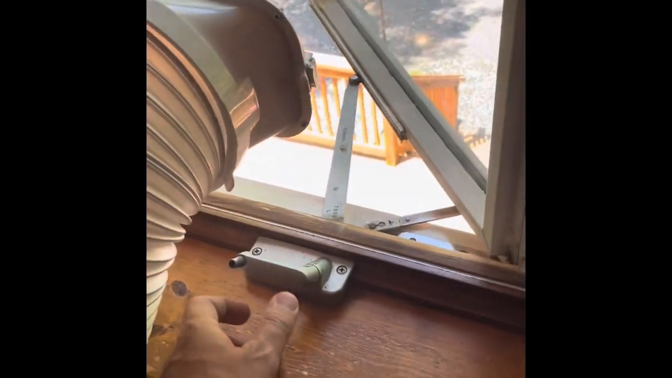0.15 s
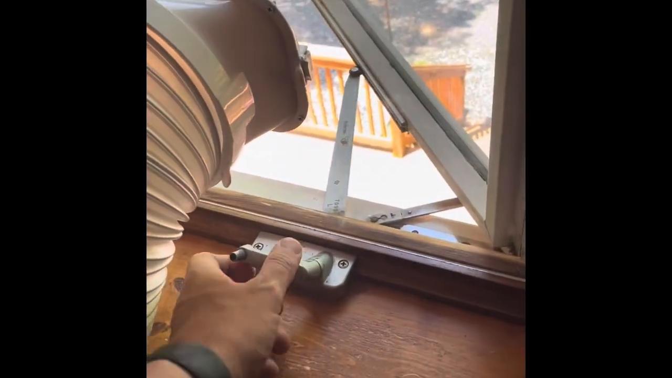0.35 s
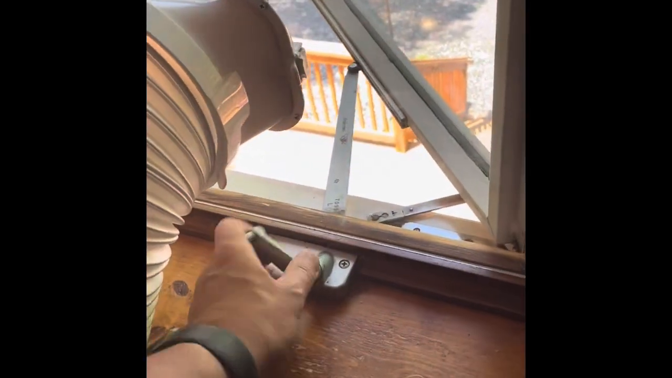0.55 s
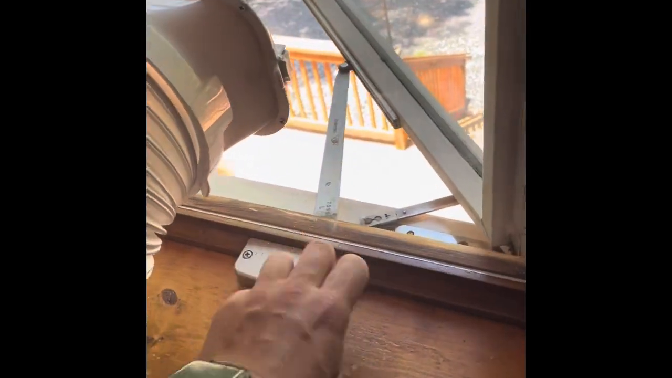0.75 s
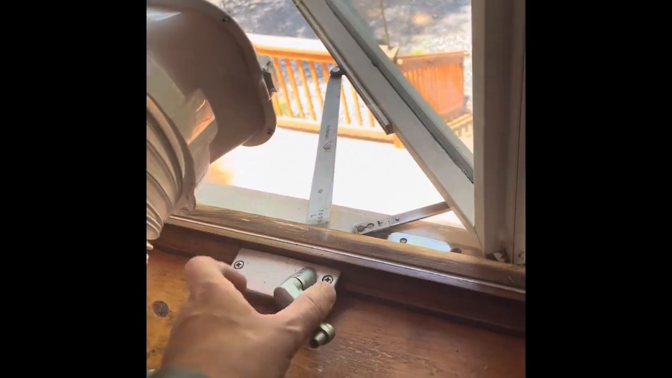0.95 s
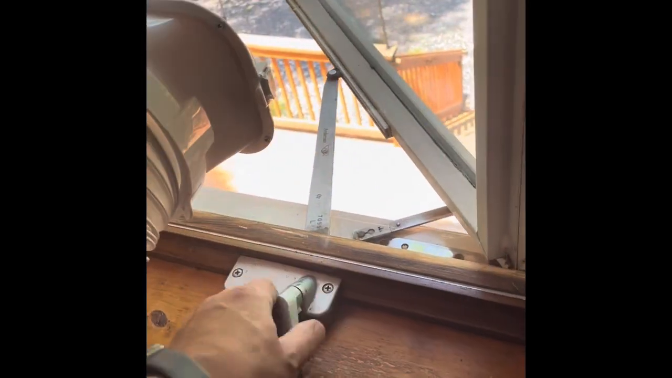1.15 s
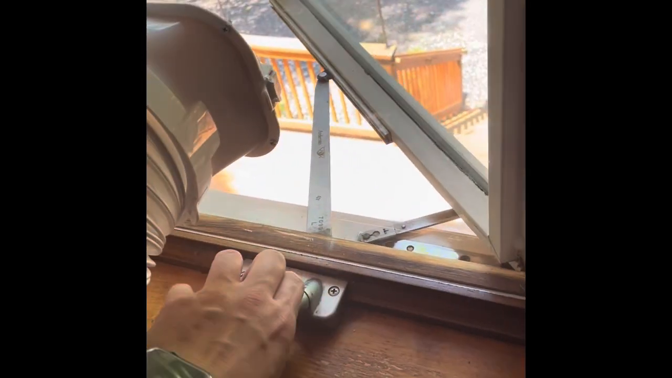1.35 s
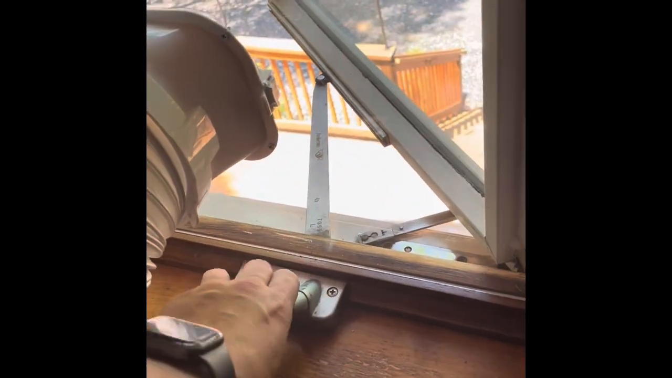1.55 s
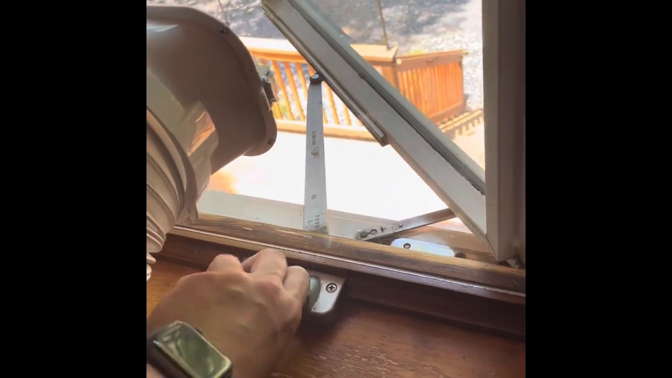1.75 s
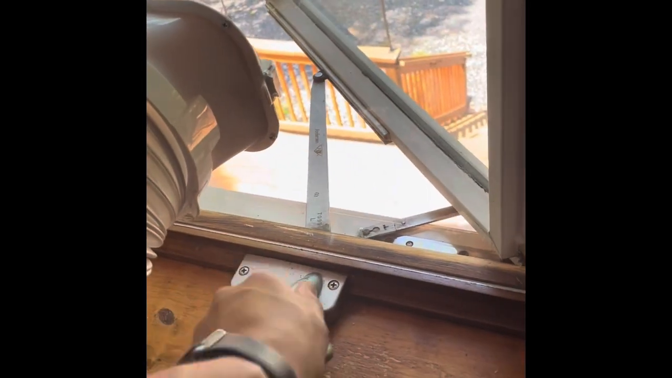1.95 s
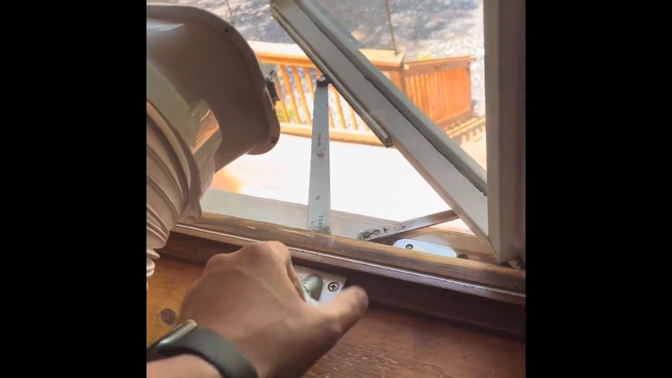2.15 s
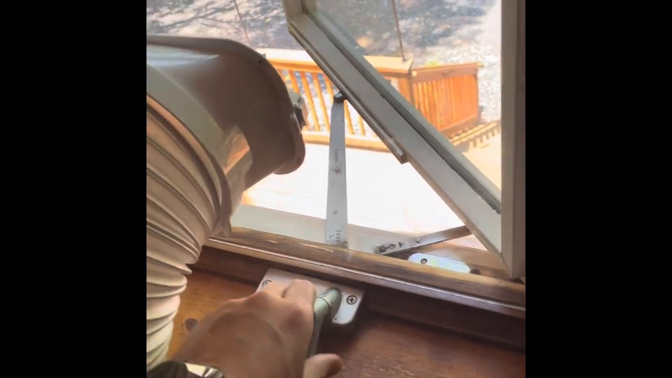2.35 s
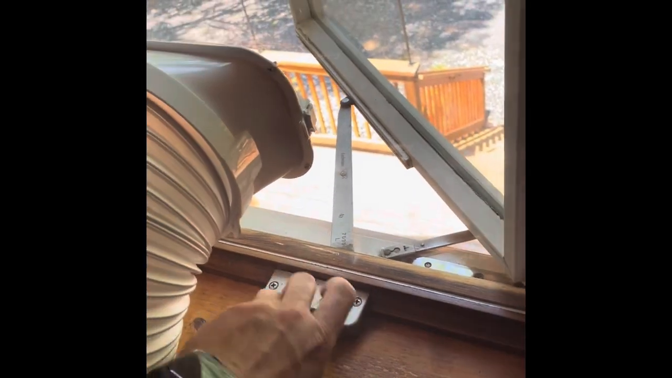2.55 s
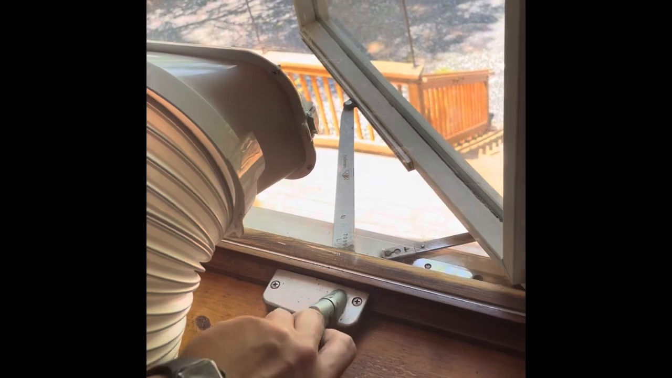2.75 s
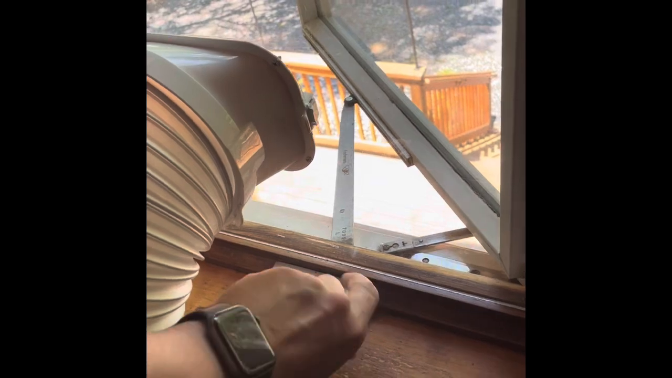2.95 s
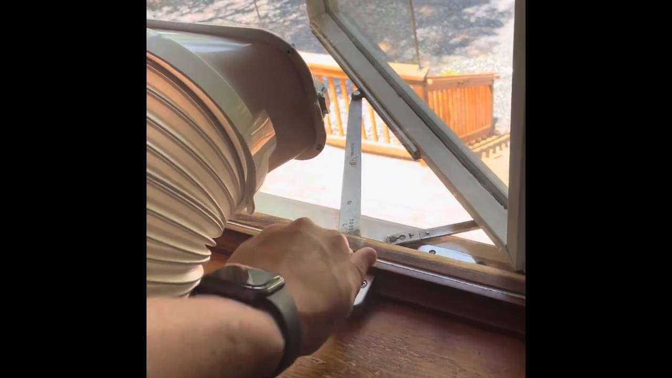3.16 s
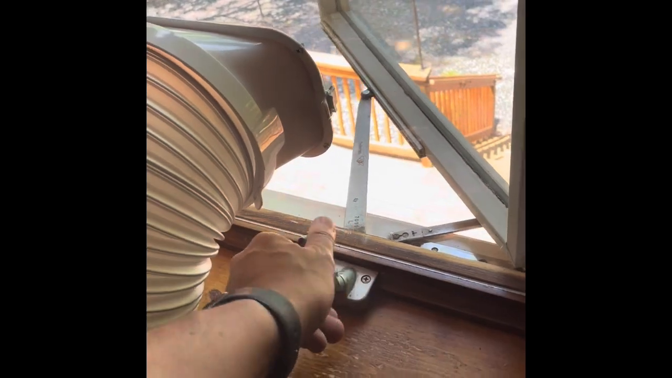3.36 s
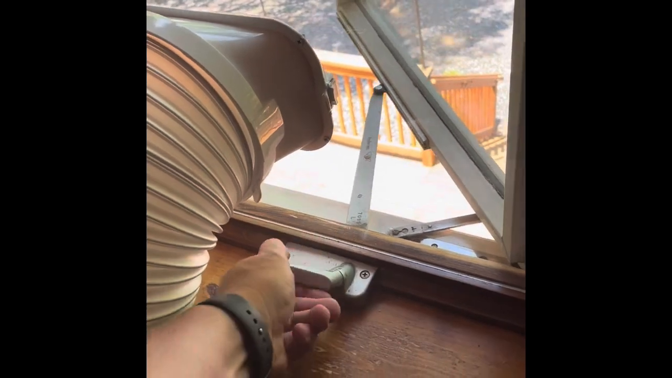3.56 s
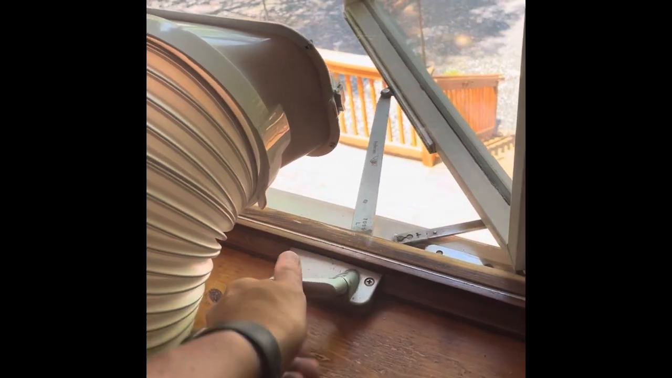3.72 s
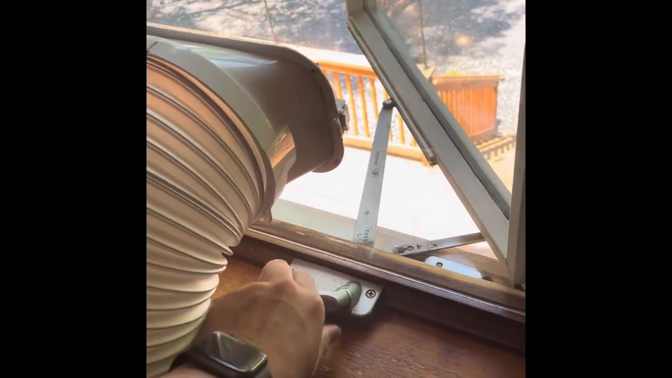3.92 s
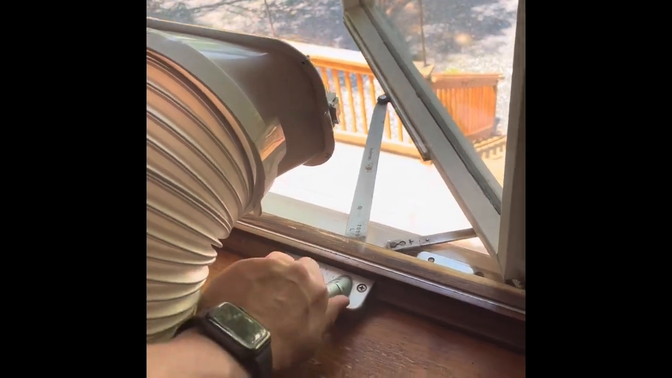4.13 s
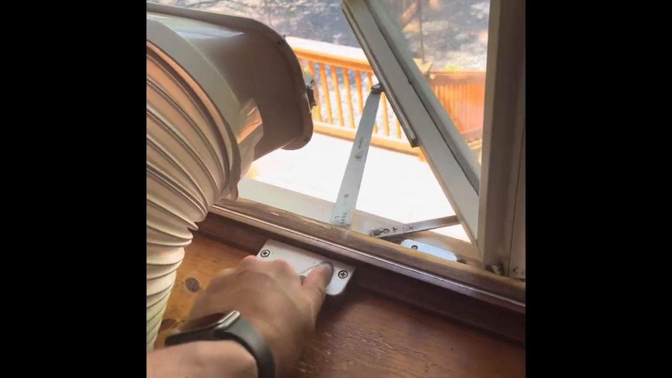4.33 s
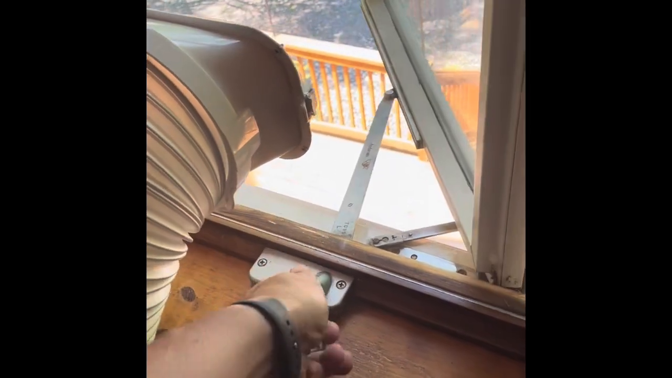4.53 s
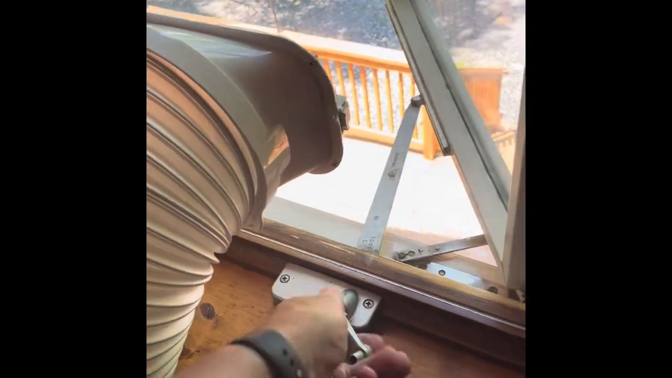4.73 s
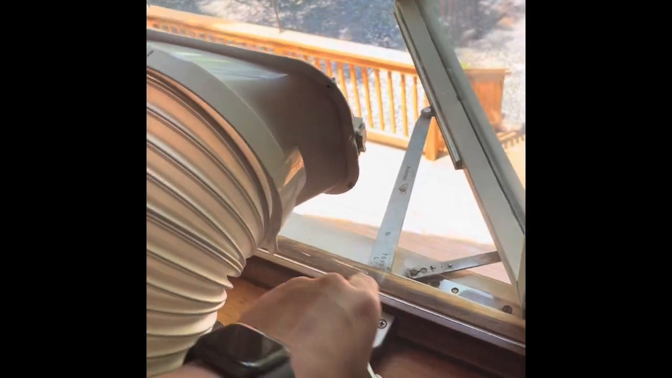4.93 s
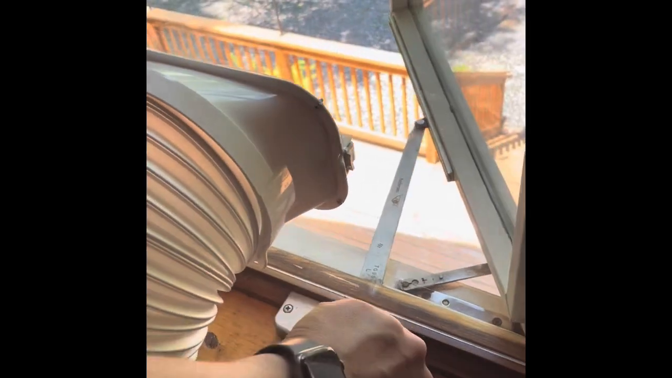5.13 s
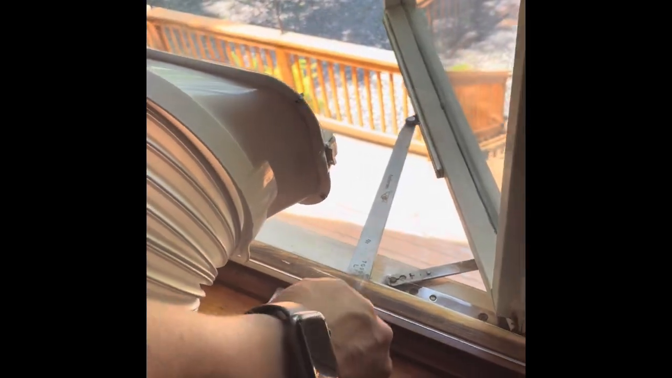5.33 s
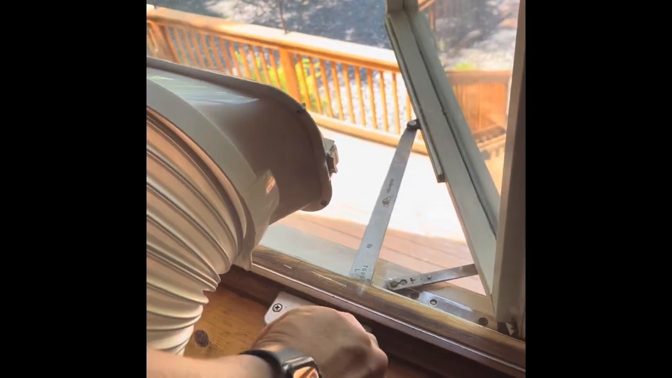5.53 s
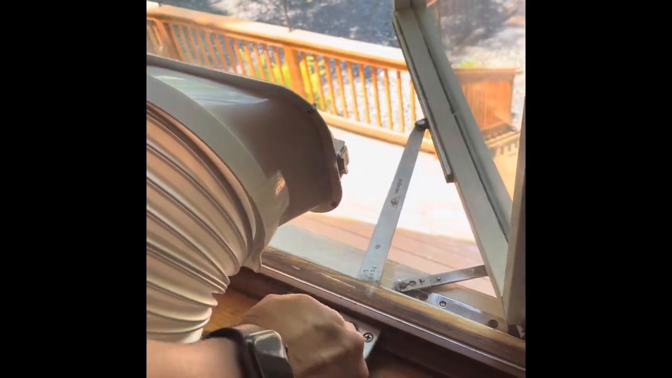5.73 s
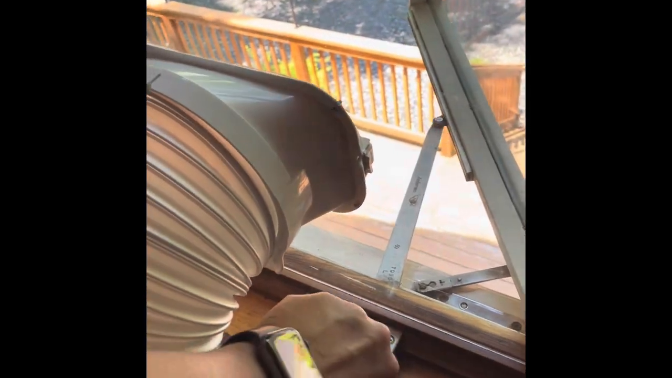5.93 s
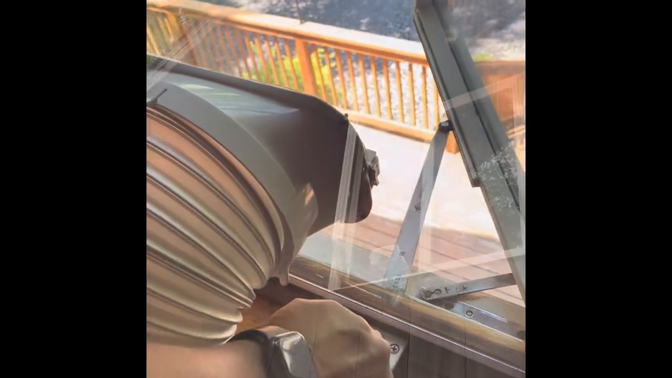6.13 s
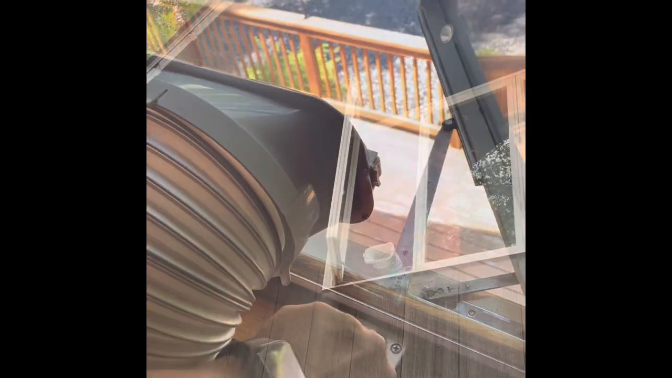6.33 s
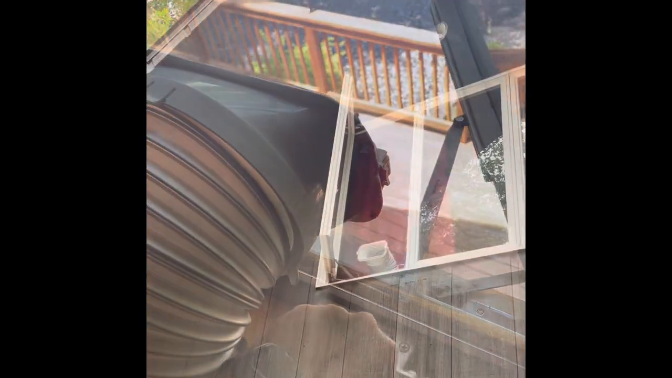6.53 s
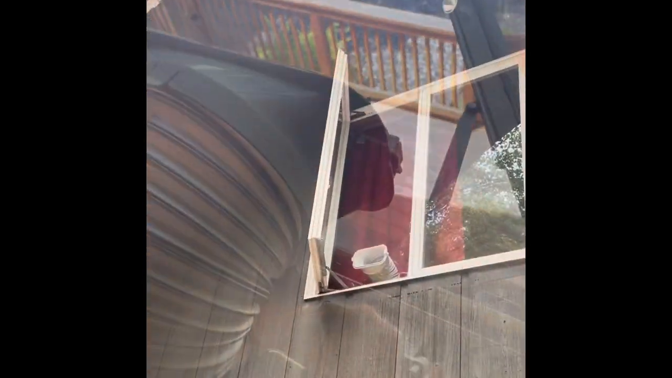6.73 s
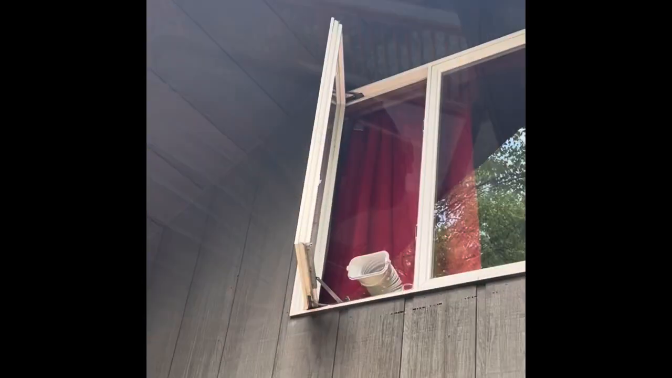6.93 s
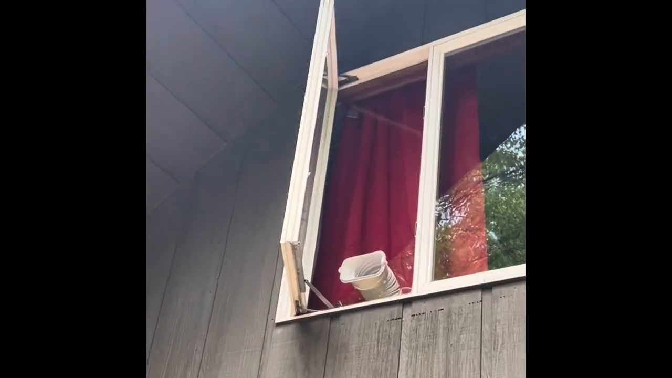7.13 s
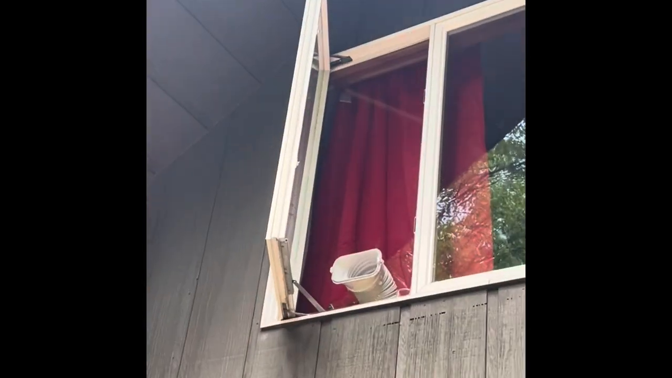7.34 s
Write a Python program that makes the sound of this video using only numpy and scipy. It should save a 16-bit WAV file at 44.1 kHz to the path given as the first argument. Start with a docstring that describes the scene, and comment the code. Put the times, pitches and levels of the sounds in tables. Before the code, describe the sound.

Close metallic clacks and gear grinding from a window crank, two sharper knocks standing out, then a quieter outdoor hum and brief airy swishes.

```python
"""A crank-operated casement window, heard close by two microphone ports in the window recess.
Skin slides first, over a low rumble; then gear teeth, handle and arm knock with play, as excited ringing modes.
Between the knocks gears grind and fingers slide, as filtered noise, and pushes thump the frame, as decaying sines.
From about 6 s the listener moves outdoors: the rumble thins and the steady lines of a fan unit fade in.
Last come airy swishes, as narrow noise bands that glide in pitch."""
import sys
import numpy as np
from scipy import signal
from scipy.fft import rfft, irfft
from scipy.io import wavfile

SR = 44100
rng = np.random.default_rng(int(sys.argv[2]) if len(sys.argv) > 2 else 0)


def voltage_ratio(level):
    """Linear amplitude factor for a level in decibels (scalar or array-like)."""
    return 10 ** (np.asarray(level, float) / 20)


def store_wav(level_fs):
    """Save 16-bit WAV to argv[1]."""
    pcm = np.round(np.clip(np.atleast_2d(level_fs), -1, 1) * 32767)
    wavfile.write(sys.argv[1], SR, pcm.T.astype(np.int16))


N = 325458

# contacts with play; weight goes to the sill, the spot struck favours a ring:
# start_s, blow_db, weight_db, sharpness_db, spot_hz
CONTACTS = [(0.325, -65.5, 11, -34, 1480), (0.373, -42, -6, -40.5, 2040), (0.413, -39, 5, -43, 422),
            (0.468, -28.5, 5, -33, 680), (0.474, -20.5, -3, -30, 2300), (0.482, -49, 6, -49, 470),
            (0.514, -51.5, 4, 2, 1720), (0.559, -37, 0, -35.5, 443), (0.587, -44, 3, -32, 2000),
            (0.615, -16.5, -10.5, -27.5, 2050), (0.646, -28, 1, -17.5, 442),
            (0.701, -40.5, -0.5, -12.5, 1960), (0.736, -46, -0.5, -28.5, 900),
            (0.847, -59.5, 13.5, -9.5, 438), (0.908, -66, 9, -7, 1550), (1.102, -35, -14, -19, 2470),
            (1.148, -32.5, -23, -23, 1970), (1.163, -36.5, -6, -22.5, 1600), (1.176, -39, 1, -26, 1614),
            (1.27, -29.5, -9, -17.5, 1630), (1.389, -30, -9, -16.5, 2360), (1.411, -40.5, -19, -32.5, 2250),
            (1.438, -37.5, -4.5, -15.5, 2860), (1.487, -32.5, -0.5, -23, 1610), (1.51, -17, -2.5, -24, 409),
            (1.778, -40.5, 0.5, -44.5, 465), (1.813, -21.5, -5, -40, 825), (1.861, -38, -2.5, -31.5, 1830),
            (1.893, -19, -8, -37, 877), (1.941, -27, -12, -28, 2080), (1.958, -21, -8, -18.5, 487),
            (2.028, -35, 1, -42, 460), (2.128, -22.5, -10, -38, 785), (2.177, -28.5, -13, -16, 930),
            (2.207, -36, -3, -42, 470), (2.264, -34.5, -19, -29, 860), (2.362, -40.5, -21, -32.5, 790),
            (2.384, -31.5, -11.5, -31, 940), (2.405, -33, -8.5, -22.5, 2570),
            (2.488, -37, -4.5, -34.5, 895), (2.505, -41, -4, -24, 2040), (2.62, -37, -28, -32, 1960),
            (2.699, -48, 2.5, -29.5, 1840), (2.745, -39.5, -9, -25, 1990), (2.855, -33.5, -5.5, -19.5, 462),
            (3.071, -32, -8, -42.5, 490), (3.282, -42.5, -36, -35.5, 1560), (3.292, -36.5, -29, -28, 1570),
            (3.308, -41, -22, -22.5, 1570), (3.323, -42, -15, -18, 2050), (3.38, -43, -13, -26, 1610),
            (3.633, -32.5, -9.5, -6.5, 2120), (3.723, -55, 10, -8.5, 1610), (3.815, -42.5, 3.5, -17, 1390),
            (4.154, -33.5, -4, -17, 2290), (4.231, -28, -18, -25.5, 2300), (4.358, -44.5, -9, -30.5, 950),
            (4.681, -45, -4, -30.5, 290), (4.712, -49.5, 6, -19, 2190), (4.732, -36, 3, -20.5, 2453),
            (4.77, -36.5, -2.5, -16.5, 2450), (4.829, -8, -12.5, -15, 2300), (4.832, -17.5, -6, -44.5, 670),
            (4.947, -59.5, 17.5, 2.5, 403), (5.059, -21.5, -3.5, -40, 442), (5.103, -34.5, 2, -27.5, 1460),
            (5.121, -48.5, 13.5, -7, 410), (5.157, -17, -3, -25, 409), (5.194, -19, -5.5, -30, 450),
            (5.309, -30.5, 1, -38, 830), (5.323, -47, 10.5, -24.5, 446), (5.375, -31, -9.5, -26.5, 2710),
            (5.479, -42, -11, -42, 1500), (5.491, -34.5, 6.5, -54, 409), (5.61, -51.5, 3, -31, 2410),
            (6.01, -57.5, -5.5, -12, 1500), (6.11, -40, -2, -13.5, 2593), (6.405, -57.5, 4.5, -29, 472),
            (6.48, -34.5, -12, -24, 1470), (6.585, -62, -22.5, -19.5, 2232), (6.646, -47.5, -3, -28, 2105),
            (6.878, -45, 1.5, -39.5, 1493), (6.913, -40, 2, -31.5, 396)]
# ticks of a loose knob on the handle: start_s, level_db
KNOB_TICKS = [(1.103, -39), (1.959, -30.5), (2.18, -40.5), (2.853, -49.5), (4.8315, -18)]
# pushes on the frame: start_s, level_db, pitch_hz
PUSHES = [(0.935, -47, 135), (1.188, -37.5, 62), (1.403, -43.5, 80.6), (1.809, -40, 63.7),
          (3.084, -41.5, 137), (1.882, -40, 148), (3.147, -38, 203), (5.899, -47, 164),
          (3.296, -35.5, 62.6), (3.845, -45.5, 75.3), (4.346, -42.5, 116), (6.274, -38.5, 222.9),
          (6.648, -46.5, 52.8)]
# what a contact rings, sill first: pitch_hz, level_db, t60_s
MODES = [(291.2, -16.5, 0.059), (409, -3, 0.021), (472.1, -1, 0.019), (517, -8.5, 0.032), (680, -8, 0.024),
         (797.4, -10, 0.023), (948, -2, 0.0071), (1217, -3.5, 0.0047), (1577, 2, 0.0059),
         (1818, -11.5, 0.034), (2050, -6, 0.017), (2300, -5, 0.012), (2710, -5, 0.01), (3047, -13.5, 0.024),
         (3500, -13, 0.012), (4207, 2.5, 0.0028), (5050, -5.5, 0.013), (5660, -3, 0.0065),
         (6796, 2, 0.0033), (8750, -6.5, 0.0048), (9110, -6, 0.0075), (10250, -10.5, 0.0066),
         (11170, -8.5, 0.014), (12927, -12, 0.004)]
# borders between the modes of sill, housing, arm, tick and glint: border_hz
PART_EDGES_HZ = [600, 1400, 4200, 7500]
# how readily each of those five parts rings: level_db
PART_DB = [11, 1, 2, 10, -0.5]
# a sharp blow wakes the higher parts: level in dB per dB of sharpness, one for each part
SHARPNESS_SHARE = [0, -0.15, 0.27, 1.05, 1.02]
# load on the worm gear and swing of the arm between contacts: time_s, load_db, swing_db
MOTION = [(0.0, -96.5, -81.5), (0.37, -81, -110), (0.57, -48.5, -69), (0.78, -67, -99), (1.05, -73, -90),
          (1.35, -52, -71), (1.54, -60.5, -101), (1.83, -65.5, -74), (1.99, -57.5, -72.5),
          (3.14, -70.5, -94), (3.3, -56.5, -71.5), (3.6, -57, -65.5), (3.68, -59.5, -88), (3.9, -62, -69),
          (4.09, -65, -85.5), (4.26, -55, -70.5), (4.36, -58, -61.5), (4.68, -64.5, -72.5),
          (5.34, -54.5, -74), (5.75, -88, -103.5), (6.52, -62.5, -78), (6.68, -72.5, -86),
          (7.38, -67.5, -73.5)]
# the hand drags over housing and sill: start_s, end_s, level_db
SCUFFS = [(0.65, 0.785, -55), (0.909, 0.968, -56), (1.908, 2.05, -48), (2.13, 2.285, -56),
          (5.5, 5.598, -57.5), (5.602, 5.65, -57), (6.025, 6.075, -62.5), (6.384, 6.465, -57.5)]
# skin slides over handle and sill: start_s, end_s, level_db, centre_hz
RUBS = [(0, 0.193, -82, 4200), (0.931, 1.074, -71, 4000), (1.02, 1.355, -70, 3700),
        (1.392, 1.493, -64.5, 4000), (1.77, 1.927, -72.5, 5050), (1.983, 2.078, -76, 3500),
        (2.507, 2.564, -74, 5000), (2.6, 2.789, -73.5, 5260), (3.699, 3.767, -70, 3540),
        (3.795, 3.884, -67, 3500), (3.898, 4.009, -55, 3430), (4.17, 4.216, -67, 4550),
        (4.292, 4.45, -69.5, 4480), (4.691, 4.796, -75, 5140), (5.217, 5.306, -74.5, 3460),
        (5.609, 5.646, -75.5, 2480), (5.751, 5.814, -74, 4390), (5.835, 5.903, -70.5, 4520),
        (6.22, 6.416, -62.5, 4057), (6.383, 6.436, -54, 2780), (6.429, 6.478, -57.5, 1520),
        (6.455, 6.67, -77, 4050)]
# relative spectra of the rumble, the sliding skin and the air: pitch_hz, level_db
RUMBLE_SPECTRUM = [(15, -44.5), (25, -2.5), (65, 8.5), (170, -3.5), (307, -11.5), (441, -34), (500, -24),
                   (650, -29.5), (1100, -120)]
SLIDE_SPECTRUM = [(400, -38), (800, -22), (2880, -2), (3690, -8.5), (4880, -4), (6760, -11.5), (7390, -35),
                  (9780, -17.5), (12500, -27.5), (13400, -34)]
AIR_SPECTRUM = [(120, -25.5), (200, -6), (1170, -28.5), (5360, -33.5), (7220, -48.5), (10000, -36.5),
                (13100, -46.5)]
# steady lines of the fan unit: pitch_hz, level_db
FAN_LINES = [(87, -55.5), (145.3, -55), (290.7, -73.5)]
# airy swishes outdoors, gliding down or up in pitch until the end:
# start_s, centre_hz, glide_hz, half_width_hz, level_db
SWISHES = [(7.17, 3020, -600, 200, -78.5), (7.26, 2880, 492, 245, -73.5), (7.31, 3640, 1099, 250, -84)]
# left port against the right: pitch_hz, level_db
LEFT_OVER_RIGHT = [(60, -1.5), (230, 0.5), (870, 7), (3320, -0.5), (12600, 2)]
# how far the left port leads the right: pitch_hz, phase_rad
LEFT_LEADS = [(300, 0), (1300, 0.3), (3200, 1.2), (4900, 0.2), (7100, 2.8), (9600, 5.0), (10400, 6.2),
              (12100, 6.7), (12800, 7.8)]

ARM_TILT = 0.2   # within the arm too: dB per octave for each dB of sharpness
SPOT_DB, SPOT_OCTAVES = 7.5, 0.11   # lift and width of the mode favoured by the spot struck
SCATTER_DB = 8   # each blow wakes the modes differently
LANDING_S, SILL_LATE_S = 0.0035, 0.0012   # spread of the loose parts; the sill answers late
DEEP_LATE_S = 0.012   # its deepest mode builds last
TOUCH_S, TOUCH_DB = 0.0032, -13   # first light touch, at most this strong
REBOUND_S, REBOUND_DB = (0.007, 0.019), -14
DETUNE = 0.02   # each contact by chance rings lower or higher by this share; the sill keeps its pitch
LESS_METAL_SHARE = 0.33   # contacts with much sill sound ring less above it: dB per dB of weight
DRAG_SHARE = 0.25   # dB of landing time per dB of dullness
RATTLES_PER_S = 40
RATTLE_DB, RATTLE_SPREAD_DB = 9, 19   # strongest above the load; range below that
RASP_HZ, RASP_DB = 2200, 6.5   # the shoe wakes the arm modes near this pitch
GRIP_DB = -5   # the palm rubs on the knob as the arm swings
RUMBLE_DB, RUMBLE_FOLLOWS = -54.5, 0.12   # at mean load; share of the load's change
OUTDOORS_S = (5.93, 7.3)   # start and end of the move outdoors
SWISH_ATTACK_S = 0.043
AIR_DB = -73
ROOM_T60_S, ROOM_DB = 0.093, -17


def knocks(load_db):
    """Loose parts land one after another, so each mode starts at its own moment; a weaker rebound follows."""
    s, blow_db, weight_db, sharp_db, spot_hz = np.vstack([CONTACTS, rattles(load_db)]).T
    drag = voltage_ratio(-DRAG_SHARE * (sharp_db + 19.5))   # dull blows land slowly
    chance = rng.random((len(s), len(MODES), 3))
    rebound_s = rng.uniform(*REBOUND_S, len(s))
    out = np.zeros(N)
    for k, (hz, level_db, t60) in enumerate(MODES):
        scatter, landing, bounce = chance[:, k].T
        part = np.searchsorted(PART_EDGES_HZ, hz)
        if part == 0:
            part_db = PART_DB[part] + weight_db
            start_s = s + SILL_LATE_S + DEEP_LATE_S * (k == 0)
        else:
            less_db = LESS_METAL_SHARE * np.maximum(weight_db, 0)
            part_db = PART_DB[part] + SHARPNESS_SHARE[part] * sharp_db - less_db
            start_s = s + drag * LANDING_S * landing ** 2 / max(part - 1, 1)
        if part == 2:
            part_db = part_db + ARM_TILT * (sharp_db + 20) * np.log2(hz / 2000)
        near = np.exp(-(np.log2(hz / spot_hz) / SPOT_OCTAVES) ** 2)
        scatter_db = SCATTER_DB * (scatter - 0.5) * (1 - near)
        blow = voltage_ratio(blow_db + part_db + level_db + SPOT_DB * near + scatter_db) * (-1) ** k

        # row 0 rings slightly lower, row 1 slightly higher
        tuning, force = rng.integers(0, 2, len(s)), np.zeros((2, N))
        rebound = blow * voltage_ratio(REBOUND_DB) * (2 * bounce - 1)
        touch = blow * voltage_ratio(TOUCH_DB) * bounce
        force[tuning, np.round(start_s * SR).astype(int)] = blow
        force[tuning, np.round((start_s + rebound_s) * SR).astype(int)] += rebound
        force[tuning, np.round((start_s - drag * TOUCH_S) * SR).astype(int)] += touch

        shift = DETUNE * min(part, 1)   # none for the sill
        swell_s = 9 / hz   # a mode takes a few cycles to swell
        swollen = ring(soften(force, hz=1.26 * hz), hz, swell_s) * 2 * np.log(1000) / (swell_s * SR)
        out += ring(swollen[0], hz * (1 - shift), t60) + ring(swollen[1], hz * (1 + shift), t60)
    return out


def rattles(load_db):
    """Small chance contacts, stronger under load and weaker outdoors, as rows like those of the contacts."""
    s, size, weight, sharp, spot = rng.random((round(RATTLES_PER_S * N / SR), 5)).T
    s = 0.02 + s * (N / SR - 0.05)   # clear of both ends
    i = (s * SR).astype(int)
    blow_db = load_db[i] + RATTLE_DB - RATTLE_SPREAD_DB * size - 15 * outside()[i]
    return np.transpose([s, blow_db, -18 + 23 * weight, -38 + 24 * sharp, 400 * 6.5 ** spot])


def glints():
    """A loose knob on the handle ticks: unsoftened clicks ring only the highest modes."""
    s, glint_db = np.transpose(KNOB_TICKS)
    force = np.zeros(N)
    force[np.round(s * SR).astype(int)] = voltage_ratio(glint_db)
    highest = [mode for mode in MODES if mode[0] > PART_EDGES_HZ[-1]]
    return sum(voltage_ratio(level_db) * ring(force, hz, t60) for hz, level_db, t60 in highest)


def gears(sill_db, arm_db):
    """Worm teeth slip in clumps that shake sill and housing, as do hand scuffs; the arm's shoe rasps in its track."""
    sizes = voltage_ratio(4.5 * np.minimum(rng.exponential(1, N), 4)) * rng.choice([-1, 1], N)
    slips_per_s = 1500 * voltage_ratio(4 * drift(rate=15))
    slips = soften(sizes * (rng.random(N) < slips_per_s / SR), hz=900)
    sill = sum(voltage_ratio(level_db) * ring(slips, hz, t60) for hz, level_db, t60 in MODES[:8])

    shoe = soften(rng.laplace(size=N) * voltage_ratio(4.5 * drift(rate=60)), hz=2500)
    arm = np.zeros(N)
    for hz, level_db, t60 in MODES[7:15]:
        rasp_db = RASP_DB * (abs(hz / RASP_HZ - 1) < 0.1)
        arm += voltage_ratio(level_db + rasp_db) * ring(shoe, hz, min(2.5 * t60, 0.025))
    arm = signal.sosfilt(signal.butter(2, 900, "high", fs=SR, output="sos"), arm)

    sill_gain = voltage_ratio(sill_db)
    for start, end, scuff_db in SCUFFS:
        a, b = round(start * SR), round(end * SR)
        sill_gain[a:b] += voltage_ratio(scuff_db) * signal.windows.tukey(b - a, 0.5)
    return sill_gain * rms_one(sill) + voltage_ratio(arm_db) * (1 - outside()) * rms_one(arm)


def sliding(grip_db):
    """Each rub is friction noise around a broad centre; skin sticks and slips, so its bands flutter apart."""
    noise, shared_db = coloured(SLIDE_SPECTRUM), 1.8 * drift(rate=30)
    edges_hz = [600, 1800, 2700, 3800, 5500, 8000, 15000]
    friction = np.zeros(N)
    for band_hz in zip(edges_hz, edges_hz[1:]):
        band = signal.sosfilt(signal.butter(2, band_hz, "band", fs=SR, output="sos"), noise)
        friction += band * voltage_ratio(shared_db + 1.1 * drift(rate=12))
    out = np.zeros(N)
    for start, end, level_db, hz in RUBS:
        a, b = round(max(start, 0) * SR), round(end * SR)
        range_hz = [hz / 2.5, min(hz * 2.6, 0.45 * SR)]
        broad = signal.lfilter(*signal.butter(1, range_hz, "band", fs=SR), friction[a:b])
        out[a:b] += voltage_ratio(level_db) * rms_one(broad) * signal.windows.tukey(b - a, 0.6)
    return out + voltage_ratio(grip_db) * rms_one(friction)


def thumps():
    """A push sets the frame swinging a few slow cycles."""
    out, t = np.zeros(N), np.arange(int(0.25 * SR)) / SR
    for s, level_db, hz in PUSHES:
        i = round(s * SR)
        envelope = (1 - np.exp(-t / 0.0054)) * np.exp(-t * (hz / 1.73 - 3))
        swing = envelope * np.sin(2 * np.pi * hz * t)
        out[i:i + len(t)] += voltage_ratio(level_db + 9) * swing[:N - i]
    return out


def outdoors():
    """Steady lines of a fan unit fade in; narrow swishes pile up at the end."""
    t = np.arange(N) / SR
    out = np.zeros(N)
    for hz, level_db in FAN_LINES:
        out += np.sqrt(2) * voltage_ratio(level_db + 0.55 * drift(rate=4.5)) * np.sin(2 * np.pi * hz * t)
    out *= outside()
    for start, hz, glide_hz, half_hz, level_db in SWISHES:
        age = t[round(start * SR):] - start
        low_band = signal.butter(4, half_hz, fs=SR, output="sos")
        band = signal.sosfilt(low_band, rng.standard_normal(len(age)))
        centre_hz = hz + glide_hz * age / age[-1]
        carrier = np.sin(2 * np.pi * np.cumsum(centre_hz) / SR)   # lifts the low band to its centre
        out[-len(age):] += voltage_ratio(level_db) * np.clip(age / SWISH_ATTACK_S, 0, 1) * rms_one(band * carrier)
    return out


def rumble(rumble_db):
    """Low lumpy noise of the house and of the moving frame; its deepest part is cut outdoors."""
    noise = voltage_ratio(rumble_db + 2.2 * drift(rate=7)) * coloured(RUMBLE_SPECTRUM)
    thin = signal.sosfilt(signal.butter(2, 70, "high", fs=SR, output="sos"), noise)
    share = outside()
    return np.sqrt(np.clip(1 - share ** 2, 0, 1)) * noise + share * voltage_ratio(-2.5) * thin


def room(x):
    """Short diffuse tail of the window recess: a part common to both ports and a brighter part."""
    t = np.arange(int(0.3 * SR)) / SR
    common, bright = rng.standard_normal((2, len(t))) * voltage_ratio(-60 * t / ROOM_T60_S) * (t > 0.003)
    # the common tail keeps mainly the middle
    common = signal.lfilter(*signal.butter(1, [600, 1500], "band", fs=SR), common)
    bright = signal.lfilter(*signal.butter(2, 2800, "high", fs=SR), bright)
    tails = np.array([common + 0.32 * bright, common - 0.79 * bright]) / np.sqrt(np.sum(common ** 2))
    return signal.fftconvolve(x[None], tails, axes=1)[:, :N]


def ports(x):
    """Two microphone ports: the left is louder in the low middle and hears the treble earlier."""
    hz = np.fft.rfftfreq(2 * N, 1 / SR)
    half = voltage_ratio(at_hz(LEFT_OVER_RIGHT, hz) / 2) * np.exp(0.5j * at_hz(LEFT_LEADS, hz))
    mirrored = np.concatenate([x, x[::-1]])   # so the ends stay smooth
    return irfft(rfft(mirrored) * [half, 1 / half], 2 * N)[:, :N]


def outside():
    """Share of the outdoor place, rising smoothly from 0 to 1."""
    start, end = OUTDOORS_S
    return np.sin(np.pi / 2 * np.clip((np.arange(N) / SR - start) / (end - start), 0, 1)) ** 2


def ring(force, hz, t60):
    """A unit click sets a sine of height 1 ringing."""
    r, w = voltage_ratio(-60 / (t60 * SR)), 2 * np.pi * hz / SR
    return signal.lfilter([0, np.sin(w)], [1, -2 * r * np.cos(w), r * r], force + 1e-18)


def soften(force, hz):
    """A contact of finite length: the click smeared by a double one-pole."""
    r = np.exp(-2 * np.pi * hz / SR)
    return signal.lfilter([(1 - r) ** 2], [1, -2 * r, r * r], force)


def coloured(spectrum):
    """Noise with the given spectrum, rms 1."""
    gain = voltage_ratio(at_hz(spectrum, np.fft.rfftfreq(N, 1 / SR)))
    return rms_one(irfft(rfft(rng.standard_normal(N)) * gain, N))


def drift(rate):
    """Slow chance, spread 1: noise through a double one-pole at rate Hz."""
    r = np.exp(-2 * np.pi * rate / SR)
    slow = signal.lfilter([1], [1, -2 * r, r * r], rng.standard_normal(N + 20000))
    return rms_one(slow[20000:])   # past the filter's start


def at_hz(points, hz):
    """Read a spectrum on a log axis."""
    point_hz, value = np.transpose(points)
    return np.interp(np.log(hz + 1), np.log(point_hz), value)


def in_time(rows):
    """Columns of a table, one value per sample."""
    s, *columns = np.transpose(rows)
    return [np.interp(np.arange(N) / SR, s, c) for c in columns]


def rms_one(x):
    """Scale to rms 1."""
    return x / np.sqrt(np.mean(x ** 2) + 1e-20)


def scene():
    """Crank, frame and background at the two ports, with the tail of the recess."""
    load_db, swing_db = in_time(MOTION)
    rumble_db = RUMBLE_DB + RUMBLE_FOLLOWS * (load_db - load_db.mean())
    crank = knocks(load_db) + glints() + gears(load_db, swing_db) + sliding(swing_db + GRIP_DB)
    low = thumps() + rumble(rumble_db)
    air = voltage_ratio(AIR_DB) * np.array([coloured(AIR_SPECTRUM), coloured(AIR_SPECTRUM)])
    # the rumble differs a little at each port
    wide = voltage_ratio(rumble_db - 15) * coloured(RUMBLE_SPECTRUM) * [[1], [-1]]
    return ports(crank + low + outdoors()) + voltage_ratio(ROOM_DB) * room(crank) + air + wide


def low_pass(x):
    """A steep cut: nothing above 13.2 kHz remains."""
    return signal.sosfilt(signal.butter(12, 13230, fs=SR, output="sos"), x)


def record(dry):
    """The microphone signal loses its top above 14.5 kHz."""
    mix = signal.sosfilt(signal.butter(4, 14500, fs=SR, output="sos"), dry)
    return low_pass(mix)


dry = scene()
out = record(dry)
store_wav(out)
```